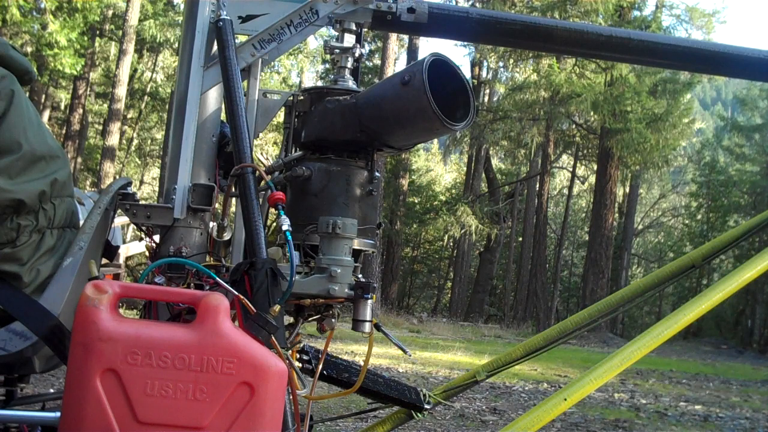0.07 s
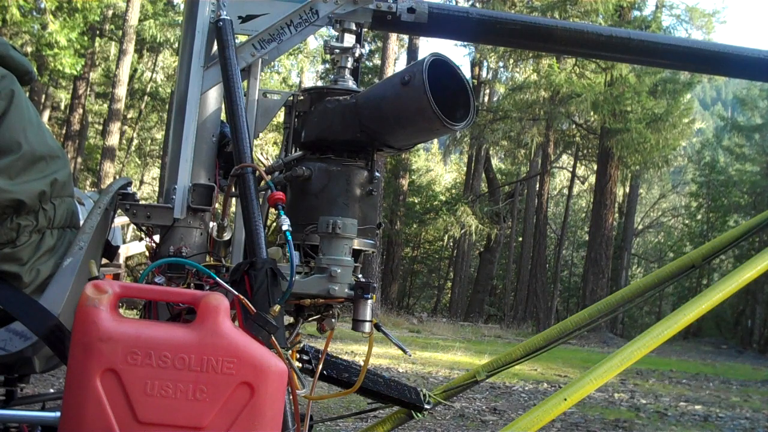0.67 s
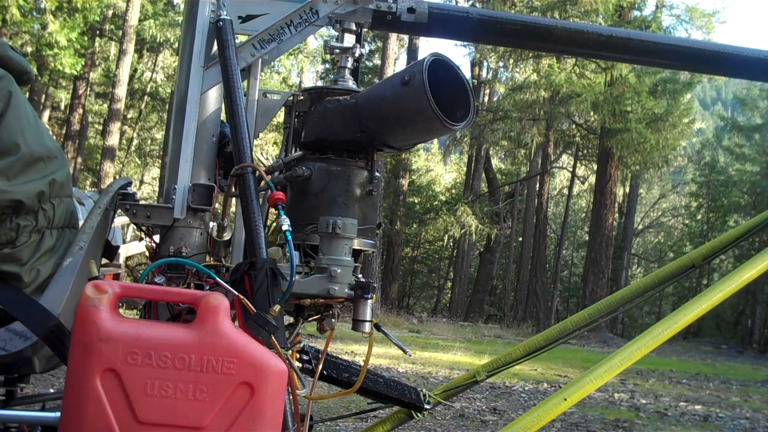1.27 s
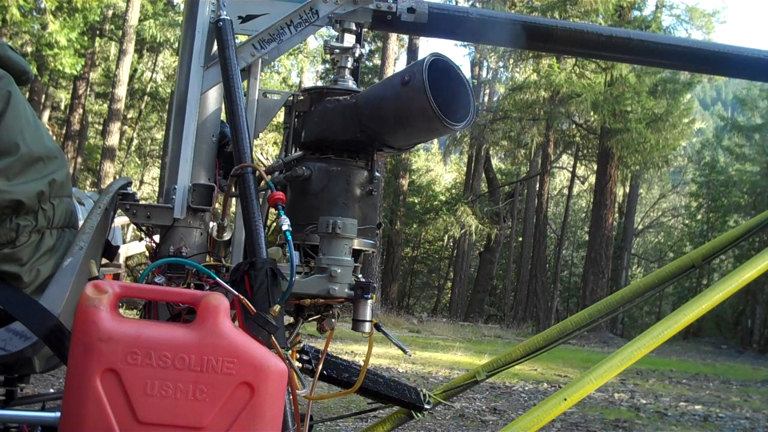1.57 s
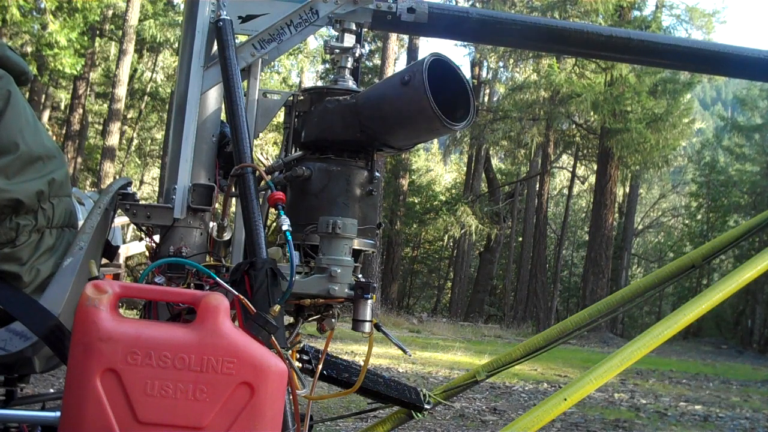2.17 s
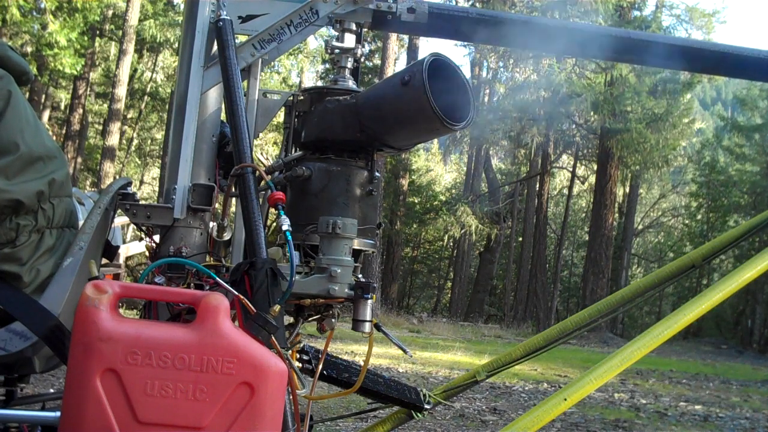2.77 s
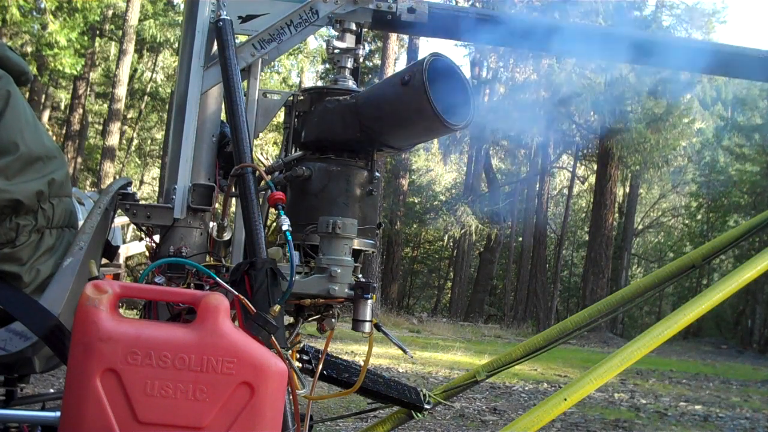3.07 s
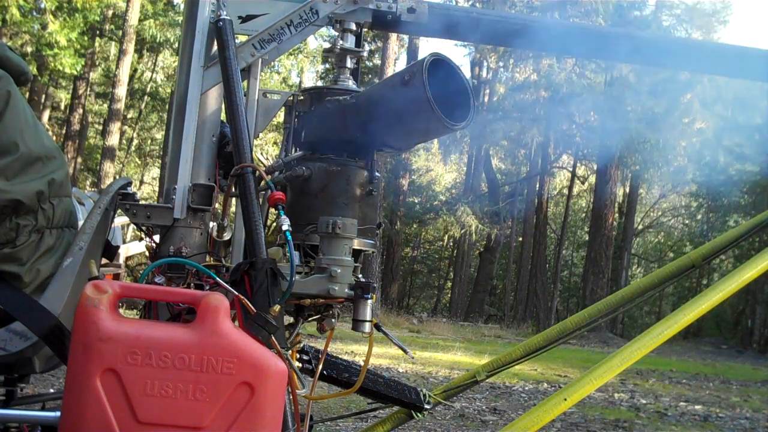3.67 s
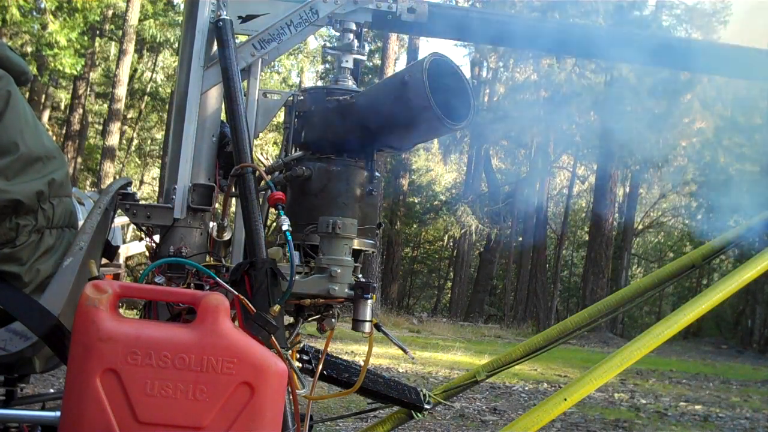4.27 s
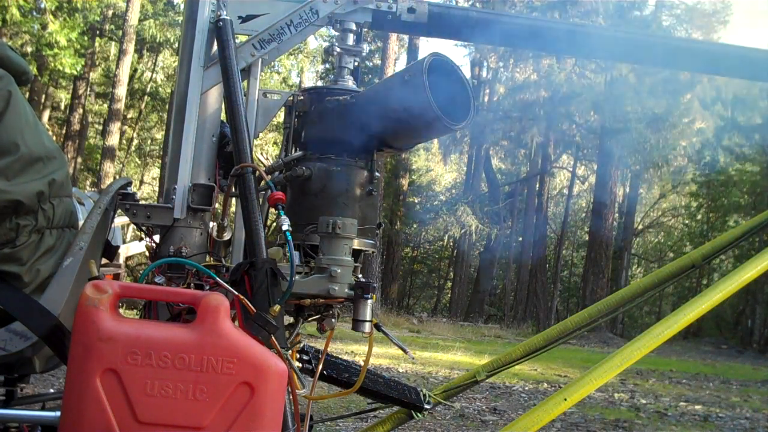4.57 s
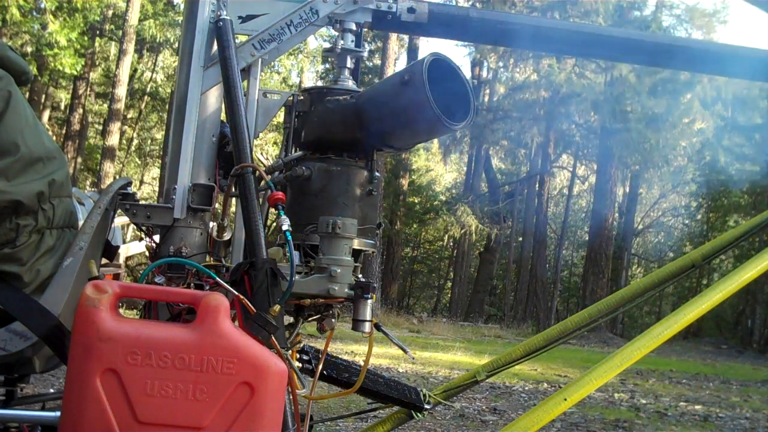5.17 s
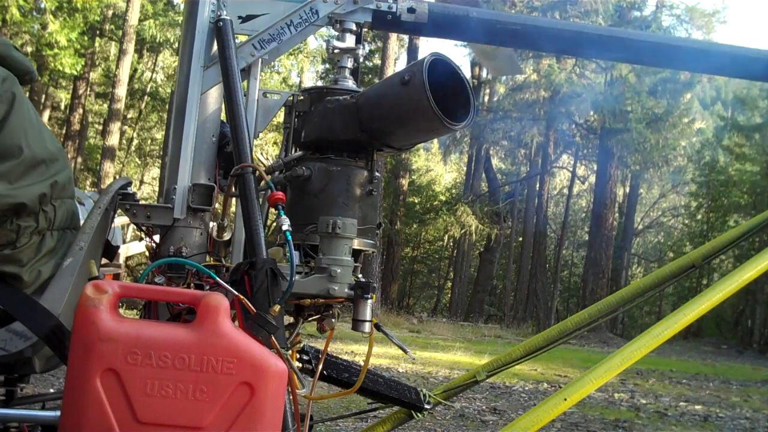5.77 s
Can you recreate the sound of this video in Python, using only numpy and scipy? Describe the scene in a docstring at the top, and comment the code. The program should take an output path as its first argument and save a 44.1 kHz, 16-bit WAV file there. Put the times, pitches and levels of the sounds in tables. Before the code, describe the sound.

In a quiet forest clearing, a fuel pump ticks faintly close to the microphone. A starter clanks and briefly grinds into mesh, and a small gas turbine begins a rising whine with rushing air, while an igniter snaps loudly about five times a second. The flame catches, sputters out a few times with soft puffs, then holds and grows into a throbbing exhaust roar beneath the whine.

```python
"""A small gas turbine starts in a forest clearing, close to the microphone. First a fuel pump ticks.
At 1.1 s the starter solenoid slams and its gear grinds into mesh; the passing blades whine upwards
in rushing air, and the igniter begins to snap about five times a second. At 2.8 s the flame catches.
It blows out three times, holds from 3.7 s, and at last roars and throbs in the exhaust pipe."""
import sys
import numpy as np
from scipy import signal
from scipy.fft import rfft, irfft
from scipy.io import wavfile

SR = 44100
rng = np.random.default_rng(int(sys.argv[2]) if len(sys.argv) > 2 else 0)


def unload_audio(sound):
    """Save the sound as a 16-bit wav file, at the path given as the first command line argument."""
    columns = np.transpose(np.atleast_2d(sound))
    # keep every value between -1 and 1, then stretch to whole-number steps
    steps = np.round(np.clip(columns, -1, 1) * 32767)
    wavfile.write(sys.argv[1], SR, steps.astype(np.int16))


N = 256220

# rotor under fuel, climbing faster while the flame burns well: (time [s], shaft speed [Hz])
FUELLED_SPEED = [(2.55, 190.3), (3.24, 230), (3.42, 236), (3.78, 248.8), (4.28, 271.3), (4.7, 282.1),
                 (5.58, 313.1), (5.81, 318.7)]
# tones of the 23-blade wheel, the 13-blade wheel and a gear: (order [cycles per turn])
SHAFT_ORDERS = [23, 46, 13, 26, 39, 20]
# one row per order: (level [dB], shaft speed at onset [Hz], shaft speed at fade [Hz])
ORDER_RANGES = [(-31, 64, 245), (-33.5, 33, 187), (-28, 208, 345), (-32, 165, 308), (-44.5, 160, 400),
                (-37, 116, 400)]
# resonances the rotor passes: (order [cycles per turn], shaft speed [Hz], half width [Hz], gain [dB])
ROTOR_RESONANCES = [(46, 132, 6.8, 8), (23, 159, 15, 8.5), (46, 166, 4.3, 6.5), (13, 179.5, 4.2, 6),
                    (26, 175, 8, 3), (13, 220, 18, 5), (20, 225, 7, 7), (26, 257, 4, 10.5),
                    (26, 270, 4.6, 5.5), (13, 319, 12, 11.5)]
# passband of the intake duct: (frequency [Hz], gain [dB])
DUCT_PASSBAND = [(900, -35), (1350, 0), (2300, -2), (4000, 0), (6000, 0), (7600, 1), (8300, -1), (9000, -4),
                 (10100, -6), (11000, -17), (14000, -38)]
# standing waves in the duct: (frequency [Hz], half width [Hz], gain [dB])
DUCT_MODES = [(2560, 177, -7.5), (3666, 97, -5.5), (4990, 150, -4.5), (6050, 440, 6.5), (7280, 1160, 7)]
# spells of burning, each lit with a puff: (ignition [s], extinction [s], puff level [dB])
FLAME_SPELLS = [(2.76, 2.848, -38), (2.947, 3.299, -37), (3.502, 3.622, -35), (3.685, 5.998, -46)]
# strength of the flame: (time [s], level [dB])
FLAME_STRENGTH = [(2.76, -42), (3.2, -31.5), (3.5, -37.5), (3.85, -30), (4.27, -29), (4.45, -37.5),
                  (4.8, -25.5), (5.15, -19.5), (5.62, -16.5), (5.68, -23.5), (5.81, -28.5)]
# loud igniter discharges: (time [s], level [dB])
LOUD_SPARKS = [(1.2716, 0.5), (1.4627, -3), (1.6508, -5), (1.8368, -6), (2.0197, -7), (2.2036, -8.5),
               (2.392, -8), (2.5741, -7), (2.7611, -7), (2.9458, -6), (3.131, -15), (3.3133, -5.5),
               (3.4987, -6.5), (3.681, -6)]
# solenoid and gear impacts: (time [s], level [dB], decay [s], housing gain [dB])
STARTER_IMPACTS = [(1.0847, -7, 0.0044, -7), (1.088, -21.5, 0.011, 3.5), (1.1938, -11, 0.0055, -20),
                   (1.202, -15, 0.0042, -4.5), (1.206, -21, .004, -9), (1.2117, -19.5, 0.0044, -2)]
# harder pump strokes: (time [s], level [dB])
PUMP_ACCENTS = [(.092, -55), (.245, -54), (.41, -56), (.616, -57)]
# modes of the casing, exhaust pipe and igniter: (frequency [Hz], width [Hz], gain [dB])
CASING_MODES = [(392, 65, 1), (591, 105, -0.5), (771, 28, 0.5), (870, 78, -2), (1090, 92, -5),
                (1155, 69, 4), (1342, 83, 2.5), (1517, 78, 1.5), (1680, 45, -0.5), (1900, 93, -6)]
EXHAUST_LOW_MODES = [(46.3, 28, -7.5), (87, 20, -0.5), (124, 28, 1.5), (178.3, 22.6, 1.5), (231, 25, -8.5)]
EXHAUST_HIGH_MODES = [(338, 91, -1.5), (474, 230, 0.5), (590, 37, -5), (704, 13, -24), (850, 52, -1),
                      (994, 110, -10), (1430, 230, -14.5)]
IGNITER_MODES = [(6010, 590, 1.5), (7356, 500, 10.5), (8180, 400, 0.5), (7960, 1430, 1.5)]
# spectra of the noise sources: (frequency [Hz], relative density [dB])
RUSH_SPECTRUM = [(40, -38), (100, -8.5), (180, -8.5), (250, -22), (400, -3), (520, -5), (690, -10.5),
                 (950, 0), (1300, -6.5), (1900, -1), (2700, 1.5), (3600, 0), (6000, -26.5)]
INTAKE_SPECTRUM = [(1500, -14.5), (2600, -2), (3500, 0), (4700, 6.5), (5300, 4), (6300, 8), (7200, 6),
                   (8000, 4.5), (8800, -6), (10000, -11), (12000, -20), (14500, -24)]
SPARK_SPECTRUM = [(50, -27), (150, -6.5), (400, -19.5), (1000, -12), (2500, -1.5), (5000, 0.5), (7000, 5.5),
                  (9000, 4.5), (11000, -2.5), (14500, -8)]
CLANK_SPECTRUM = [(300, -34), (1000, -2), (1500, -9), (3000, 6), (4000, 4), (5000, 3.5), (6100, 4.5),
                  (6800, 1.5), (7700, 6), (9000, -6), (14000, -25)]
PUMP_SPECTRUM = [(300, -17), (650, 2.5), (1000, -6), (1400, -1.5), (2000, -13), (3000, -4), (3800, -9),
                 (5000, -4), (5700, 2.5), (6500, -7), (7600, -8), (9000, -16), (14000, -31)]
FOREST_SPECTRUM = [(25, -18), (60, -3), (130, 2.5), (250, -5), (450, -10), (650, -9), (1100, -14),
                   (2000, -15.5), (3000, -23), (4000, -23), (7000, -35), (14000, -34)]
# two microphone ports, engine to the left:
# (frequency [Hz], left minus right [dB], coherence [0-1], left phase lead [rad])
MIC_PORTS = [(60, 2.2, 0.99, 0), (400, 1.5, 1, 0), (1100, 1.04, 0.99, 0), (2420, 0, 1, 0),
             (3960, 1, 1, 0.4), (5170, -2, 0.87, 0.2), (6100, -4, 1, 0.88), (6600, 4, 0.97, 1.38),
             (6830, 10, 1, 1.5), (7300, 16.5, 0.98, 0.1), (8560, 13.5, 0.77, 0.6),
             (10350, 11.5, 0.23, -0.9), (14300, 20.5, 0.43, -3.5)]

CRANK_S, TOP_HZ = 1.0938, 14500  # starter engages; upper band limit


def blades(wobble=0.001, flutter_db=1.48, ragged_db=2.06, rasp=.33, stall_db=-32, hum_db=-50):
    """Periodic forcing: blades and gear teeth radiate tones at multiples of one wavering shaft speed."""
    t, hz, speed = clock(), bins(), shaft_speed()
    angle = 2 * np.pi * np.cumsum(speed * (1 + wobble * wander(45))) / SR
    duct_db = np.interp(hz, *np.transpose(DUCT_PASSBAND))
    duct_db += sum(db * bell(hz, centre, width) for centre, width, db in DUCT_MODES)
    dip_db = -5 * bell(t, 4.67, 0.096)  # the whine dips briefly
    # flow over a slow wheel is ragged, most of all as the starter first drags it round
    slow = 1 / (1 + (speed / 190) ** 6)
    drag = .5 / (1 + (speed / 110) ** 8)
    roughness = rasp * (.4 + slow + drag)
    eddies = wander(200) + 1j * wander(200)
    flutter = wander(16.6)

    def tone(order, db, onset_hz, fade_hz):
        """Modulation by eddies roughens one shaft order; resonances of rotor and duct colour it."""
        pitch, shift = order * speed, rng.integers(N)
        sounding = ((1 + (onset_hz / speed) ** 12) * (1 + (speed / fade_hz) ** 12)) ** -.5
        swell_db = sum(rise * bell(speed, centre, width)
                       for multiple, centre, width, rise in ROTOR_RESONANCES if round(multiple) == order)
        waver_db = (flutter_db + ragged_db * slow) * np.roll(flutter, shift)
        gain = sounding * undb(db + swell_db + dip_db + waver_db + np.interp(pitch, hz, duct_db))
        wave = np.real((1 + roughness * np.roll(eddies, shift)) * np.exp(1j * order * angle))
        return gain * (pitch < TOP_HZ) * np.sqrt(2) * wave

    whine = sum(tone(order, *row) for order, row in zip(SHAFT_ORDERS, ORDER_RANGES))
    blade_count = SHAFT_ORDERS[0]
    # while the wheel is slow, a comb of its harmonics fits through the duct
    for harmonic in range(3, 11):
        whine += tone(blade_count * harmonic, db=-39 - 1.9 * (harmonic - 3), onset_hz=29, fade_hz=153)
    # at middling speeds the flow separates from the blades and smears their tone
    stall = (wander(560) + 1j * wander(590)) / (1 + ((speed - 156) / 30) ** 6)
    whine += undb(stall_db) * np.real(stall * np.exp(1j * blade_count * angle))
    # the unbalanced rotor hums as it runs through the resonance of its mount
    mount = 1 / (1 + ((speed - 118) / 26) ** 4)
    hum = undb(hum_db + (flutter_db + ragged_db) * flutter) * np.sin(angle) * mount
    return ramp(t - 1.15, 0.027) * (whine + hum)


def shaft_speed(scale_hz=138.05, ease_s=.4878):
    """Inertia: the rotor gains speed [Hz] ever more slowly on the starter, then climbs under fuel."""
    cranked = scale_hz * np.log1p(np.maximum(clock() - CRANK_S, 0) / ease_s)
    return np.maximum(np.minimum(cranked, over_time(FUELLED_SPEED)), 1)


def airflow(flicker_db=1.17, grind_from_s=1.11, meshed_s=1.3):
    """Turbulence, growing with speed and flame, excites casing and intake; so does the meshing gear."""
    t, throb = clock(), throb_strength()
    decades = np.log10(shaft_speed() / 300)  # relative to full speed
    meshing = ramp(t - grind_from_s, meshed_s - grind_from_s)
    grind = ramp(np.minimum(t - grind_from_s, meshed_s - t), 0.033)
    rush_gain = np.hypot(undb(-32.5 + 18.5 * decades + 3 * throb), undb(-38) * grind)
    hiss_gain = np.hypot(undb(-19 + 28 * decades + 2 * throb), undb(-31.5) * grind * meshing)
    inside = undb(2) * noise(spectrum(RUSH_SPECTRUM)) + undb(-1) * noise(resonances(CASING_MODES))
    intake = noise(spectrum(INTAKE_SPECTRUM) / (1 + (1200 / bins()) ** 2))
    rush = rush_gain * undb(flicker_db * wander(41)) * inside
    hiss = hiss_gain * undb(flicker_db * wander(19)) * intake
    return ramp(t - CRANK_S, .02) * (rush + hiss)


def combustion(puff_s=0.044, edge_s=0.0076, sputter_db=1.5, throb_hz=45.65, pulsing=0.47):
    """Pipe resonance: the sputtering flame drives the exhaust modes and, when strong, a throb."""
    t, flame_db, locked = clock(), over_time(FLAME_STRENGTH), throb_strength()
    lit = sum(ramp(t - on, edge_s) * ramp(off - t, 2 * edge_s) for on, off, _ in FLAME_SPELLS)
    puffs = sum(undb(db) * burst(on, edge_s, puff_s) for on, _, db in FLAME_SPELLS)
    rumble_gain = undb(-33 + 0.73 * (flame_db + 29.5)) + puffs
    cycle = 2 * np.pi * np.cumsum(throb_hz * (1 + 0.06 * wander(23.9))) / SR
    # each throb is a sharp dip in pressure with a gust of roar on it
    throb = -locked * (.7 * np.cos(cycle) + .9 * np.cos(2 * cycle) + .3 * np.cos(3 * cycle))
    gust = 1 + pulsing * locked * np.cos(cycle)
    rumble = rumble_gain * ((1 - 0.31 * locked) * noise(resonances(EXHAUST_LOW_MODES)) + throb)
    roar = undb(flame_db - 1) * gust * noise(resonances(EXHAUST_HIGH_MODES))
    return lit * undb(sputter_db * wander(33)) * (rumble + roar)


def throb_strength(threshold_db=-29, range_db=9):
    """Lock-in: above a threshold the flame settles into its throb, by a degree from 0 to 1."""
    return ramp(over_time(FLAME_STRENGTH) - threshold_db, range_db)


def igniter(period_s=.1838, decay_s=0.0073, tail_s=0.043, thump_s=0.0069):
    """Impulse excitation: each spark cracks and rings the igniter; a tail scatters off the frame."""
    last_s = LOUD_SPARKS[-1][0]
    # in the steady flame it ticks on softly, fading 2 dB a second
    soft = [(last_s + age, -13 - 2 * age) for age in np.arange(period_s, N / SR - last_s, period_s)]
    sparks = list(LOUD_SPARKS) + soft
    crack = sum(undb(db) * burst(at, 0.00067, decay_s) for at, db in sparks)
    ring = sum(undb(db) * (burst(at, 0.0017, decay_s) + undb(-24) * burst(at, 0.0052, tail_s))
               for at, db in sparks)
    # while the air is still slow, the sparks also thump the chamber
    thump = sum(undb(db) * burst(at, 0.0013, thump_s) for at, db in LOUD_SPARKS)
    thump /= 1 + (shaft_speed() / 105) ** 10
    return (undb(-5) * crack * noise(spectrum(SPARK_SPECTRUM))
            + undb(-1) * ring * noise(resonances(IGNITER_MODES))
            + undb(-35) * thump * noise(1 / (1 + (bins() / 220) ** 4)))


def starter(tail_db=-25, tail_s=0.057, ping_hz=8720):
    """Damped vibration after impact: the solenoid slams and pings, then the gear clatters into mesh."""
    metal = housing = 0
    for at, db, decay_s, housing_db in STARTER_IMPACTS:
        blow = undb(db) * (burst(at, 0.00076, decay_s) + undb(tail_db) * burst(at, 0.0044, tail_s))
        metal += blow
        housing += blow * undb(housing_db - 9)
    clank = metal * noise(spectrum(CLANK_SPECTRUM))
    knock = housing * noise(resonances([(624, 130, 7.5), (1510, 430, -1)]))
    ping = undb(-32) * burst(STARTER_IMPACTS[0][0], .001, 0.02) * np.sin(2 * np.pi * ping_hz * clock())
    return clank + knock + ping


def fuel_pump(count=17, stroke_hz=17, jitter_s=0.0064, decay_s=0.013):
    """A quasi-periodic pulse train: the strokes tick faintly, uneven in time and level."""
    strokes = sum(undb(-58.5 + size) * burst(0.08 + k / stroke_hz + jitter_s * late, .002, decay_s)
                  for k, (late, size) in enumerate(rng.standard_normal((count, 2))))
    accents = sum(undb(db) * burst(at, .002, decay_s) for at, db in PUMP_ACCENTS)
    return np.maximum(strokes, accents) * noise(spectrum(PUMP_SPECTRUM), spread=.25)


def fuel_line(empty_db=-69, rise_db=5):
    """Flow noise: a thin hiss grows as the line fills."""
    colour = resonances([(3000, 560, -2.5), (4600, 380, -1), (5620, 440, 2.5), (7530, 1300, -2)])
    return undb(empty_db + rise_db * ramp(clock() - .68, 0.21)) * noise(colour, spread=.3)


def forest_air(level_db=-64):
    """A diffuse field: quiet forest air, nearly incoherent between the two sides."""
    return undb(level_db + 0.19 * wander(8.2)) * noise(spectrum(FOREST_SPECTRUM), spread=0.91)


def with_echoes(direct, frame_db=-16, frame_s=.008, trees_db=-20, trees_s=.07):
    """Interference with echoes off the frame and nearest trees makes a gliding tone swell and fade."""
    frame, trees = burst(0.00096, 0.00084, frame_s), burst(0.029, 0.022, trees_s)
    tails = undb(frame_db) * frame / np.linalg.norm(frame)
    tails += undb(trees_db) * trees / np.linalg.norm(trees)
    response = tails * noise(1)
    return direct + signal.fftconvolve(direct[None], response[:, :SR // 2], axes=1)[:, :N]


def noise(gain, spread=0):
    """Partially coherent stereo noise, shaped by gain, near unit level; spread lowers the coherence."""
    coherence = np.clip(over_hz(MIC_PORTS, column=2) * (1 - spread), 0, 1)
    width = np.sqrt((1 - coherence) / (1 + coherence))
    mid = irfft(rfft(rng.standard_normal(N)) * gain, N)
    side = irfft(rfft(rng.standard_normal(N)) * gain * width, N)
    return np.array([mid + side, mid - side]) / mid.std()


def wander(rate_hz):
    """Low-pass noise: a smooth random fluctuation of unit variance."""
    drift = irfft(rfft(rng.standard_normal(N)) * np.exp(-(bins() / rate_hz) ** 2), N)
    return drift / drift.std()


def resonances(modes):
    """Power addition of steep-sided modes: (frequency [Hz], width [Hz], gain [dB])."""
    hz, power = bins(), 0
    for centre, width, db in modes:
        detuning = (hz - centre ** 2 / hz) / (2 * width)
        power += (undb(db) / (1 + 2 * detuning ** 2)) ** 2
    return np.sqrt(power)


def burst(start_s, rise_s, decay_s):
    """Exponential decay after a linear rise: the envelope of a blow."""
    age = clock() - start_s
    return ramp(age, rise_s) * np.exp(-np.maximum(age - rise_s, 0) / decay_s)


def ramp(x, span):
    """Linear rise from 0 to 1 as x crosses the span."""
    return np.clip(x / span, 0, 1)


def bell(x, centre, width):
    """Gaussian hump of height 1."""
    return np.exp(-((x - centre) / width) ** 2)


def spectrum(table):
    """Amplitude gain per bin from (frequency [Hz], level [dB])."""
    return undb(over_hz(table))


def over_hz(table, column=1):
    """Interpolation of one column in log frequency."""
    rows = np.array(table)
    return np.interp(np.log(bins()), np.log(rows[:, 0]), rows[:, column])


def over_time(table):
    """Linear interpolation in time."""
    return np.interp(clock(), *np.transpose(table))


def undb(db):
    """Decibels to amplitude ratio."""
    return 10 ** (np.asarray(db) / 20)


def clock():
    """Time of every sample [s]."""
    return np.arange(N) / SR


def bins():
    """Frequency of every spectral bin [Hz]."""
    return np.maximum(np.arange(N // 2 + 1) * SR / N, 1)


def scene():
    """Superposition of all sources; the microphone's body shades and delays treble at the right port."""
    engine = with_echoes(blades()) + airflow() + combustion() + igniter() + starter()
    background = fuel_pump() + fuel_line() + forest_air()
    left_over_right = spectrum(MIC_PORTS) * np.exp(1j * over_hz(MIC_PORTS, column=3))
    ports = 2 * np.array([left_over_right, np.ones_like(left_over_right)]) / (1 + left_over_right)
    return irfft(rfft(engine + background) * ports, N)


def record(dry):
    """Saturation and band limiting: after a quick fade-in the loudest sparks clip and the top is cut."""
    fade_in = ramp(clock() - .038, .01)
    lowpass = signal.ellip(10, .1, 70, TOP_HZ, fs=SR, output="sos")
    return signal.sosfilt(lowpass, np.clip(dry * fade_in, -.95, .95))


dry = scene()
out = record(dry)
unload_audio(out)
```